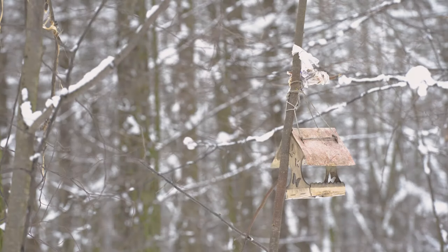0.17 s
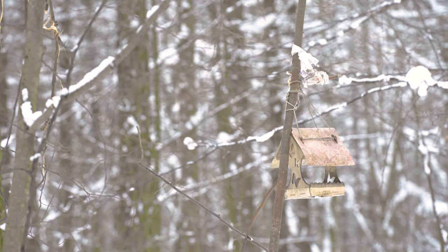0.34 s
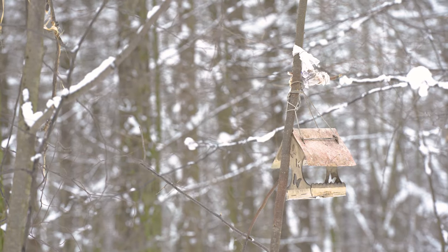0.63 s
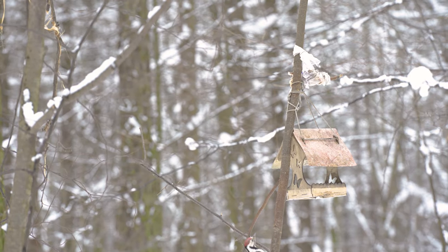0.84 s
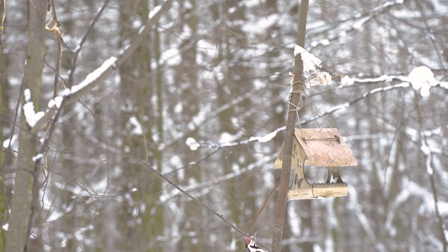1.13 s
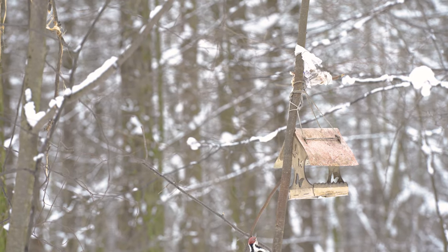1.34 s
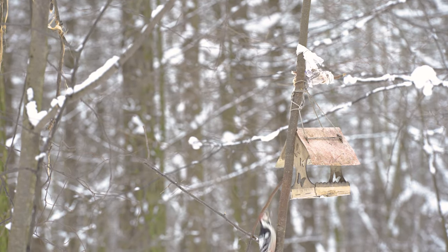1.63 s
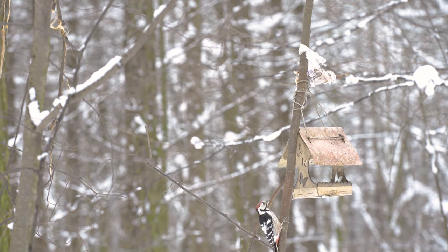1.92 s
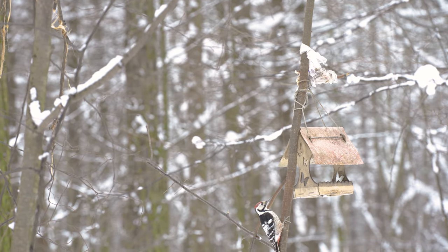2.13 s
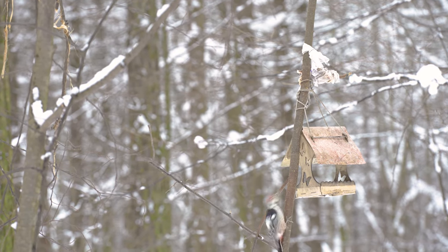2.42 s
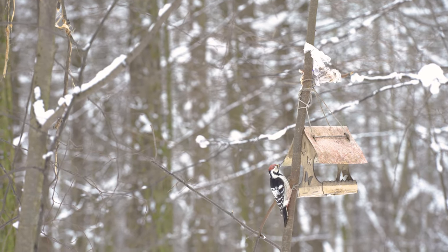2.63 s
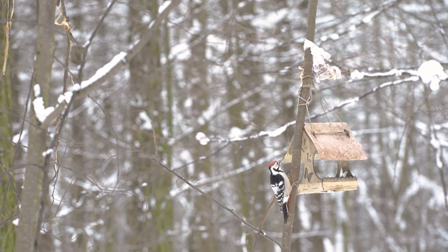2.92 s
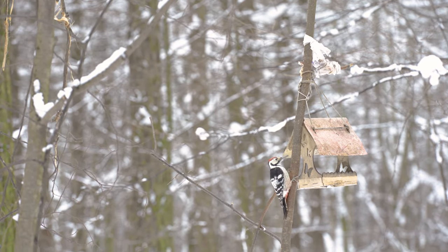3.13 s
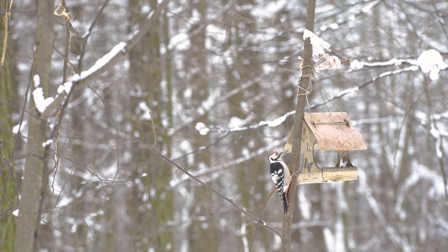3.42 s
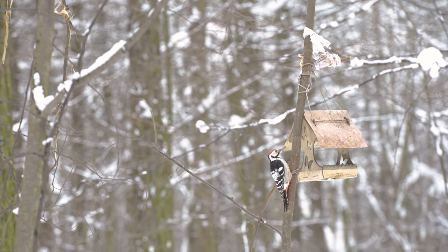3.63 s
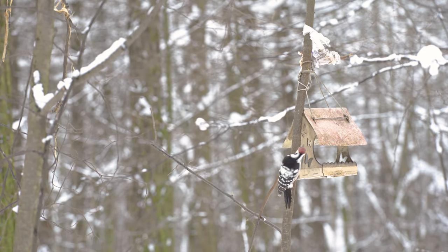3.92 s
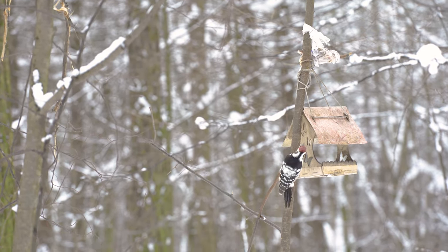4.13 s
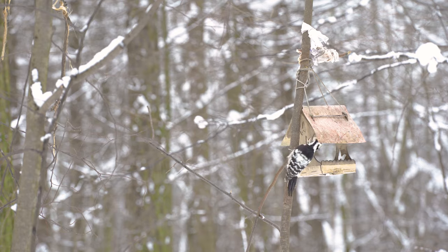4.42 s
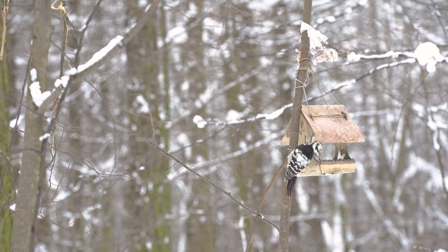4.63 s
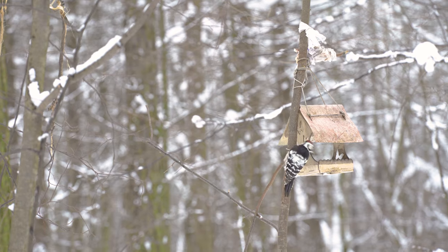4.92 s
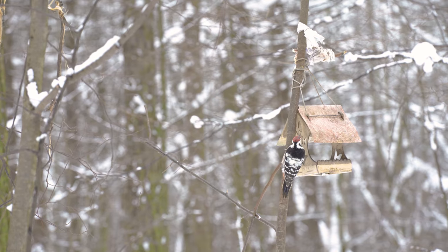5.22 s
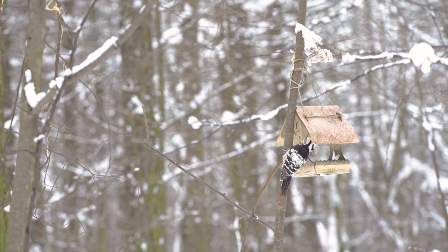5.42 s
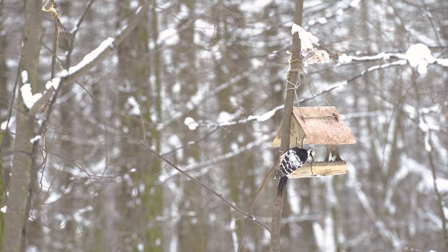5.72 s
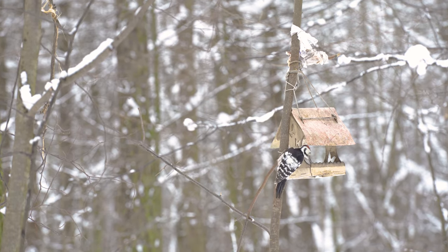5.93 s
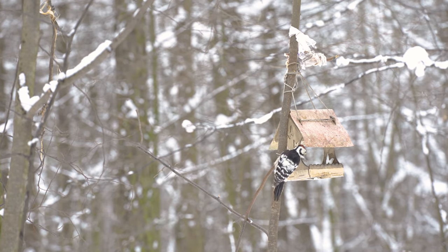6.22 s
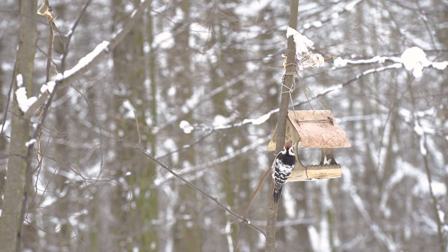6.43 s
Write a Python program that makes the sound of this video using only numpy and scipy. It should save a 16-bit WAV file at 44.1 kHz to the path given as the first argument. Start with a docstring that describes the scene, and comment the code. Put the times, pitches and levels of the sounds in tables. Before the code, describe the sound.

Quiet snowy woodland with a woodpecker at a wooden feeder, but the foreground is camera handling: loud plasticky snaps, rubbing and boomy knocks in the first half second, another knock near 1.4 seconds, then small sparse clicks. Two tiny high squeaks, bird-like and very short, stand out. Low thumps near the end precede final clicks and a bright rustle. Dry, close, mono sound over faint hiss.

```python
"""Handling a camera in a snowy forest

Close to the microphone of a hand-held camera, fingers click, scrape and knock on the housing: bursts of
noise and short swings set its parts ringing. Slow swings thump in the bass over a low rumble, a loose
part ticks, and two short squeaky calls, built from harmonics, ring out.
A distant wash and amplifier hiss, made of coloured noise, lie underneath."""
import sys
import numpy as np
from scipy import signal
from scipy.io import wavfile
from scipy.ndimage import uniform_filter1d

SR = 44100
rng = np.random.default_rng(int(sys.argv[2]) if len(sys.argv) > 2 else 0)


def int16_out(signal):
    """Quantize to a 16-bit WAV file."""
    q = np.round(np.clip(np.atleast_2d(signal).T, -1, 1) * 32767)
    wavfile.write(sys.argv[1], SR, q.astype(np.int16))


N = 289737  # length in samples


def gain_of(db):
    """Turns decibels into amplitude."""
    return 10 ** (np.asarray(db) / 20)


def evened(x):
    """Scales a sound to an rms (average strength) of 1."""
    return x / np.sqrt(np.mean(x ** 2, -1, keepdims=True) + 1e-20)


def read(points, hz):
    """Reads a table of (pitch, level) between its points, on a logarithmic pitch axis."""
    point_hz, value = np.transpose(points)
    return np.interp(np.log(hz + 1), np.log(point_hz + 1), value)


def add(mix, start_s, sound):
    """Mixes a sound in at a start time, cutting off what falls outside."""
    at = round(start_s * SR)
    sound = sound[max(-at, 0):]
    part = mix[max(at, 0):][:len(sound)]
    part += sound[:len(part)]


def shaped_noise(colour, patchy_db, size):
    """Noise with a given colour, whose short-time spectrum slowly drifts in patches; rms 1."""
    frames, hz = 4 * N // size + 5, np.fft.rfftfreq(size, 1 / SR)
    real, imaginary, patches = rng.standard_normal((frames, len(hz), 3)).T
    patches = uniform_filter1d(patches, size=12, axis=0)  # smooth over pitch
    patches = uniform_filter1d(patches, size=14, axis=1)  # smooth over time
    level_db = read(colour, hz)[:, None] + patchy_db * patches / patches.std()
    spectra = (real + 1j * imaginary) * gain_of(level_db)
    noise = signal.istft(spectra, nperseg=size, noverlap=3 * size // 4)[1]
    return evened(noise[:N])


def ring(modes, tune):
    """The answer to one tap: each mode swells, then dies; wider modes die sooner."""
    t = np.arange(512) / SR
    total = np.zeros(len(t))
    for k, (hz, width, db) in enumerate(modes):
        swell_and_fall = width ** 2 * t * np.exp(-np.pi * width * t)
        total += (-1) ** k * gain_of(db) * swell_and_fall * np.sin(2 * np.pi * hz * tune * t)
    return total


def housing(drive, treble_db, lower_db, fizz_db, tune):
    """One drive rings three groups of modes; the lower and fizz levels are relative to the treble."""
    # cavity by the microphone: pitch_hz [Hz, before tuning], width_hz [Hz], level_db [dB, relative]
    cavity = [(4900, 1700, -4.5), (5880, 700, -4.5), (6320, 570, 4), (6930, 1000, -4)]
    # shell of the housing: pitch_hz [Hz, before tuning], width_hz [Hz], level_db [dB, relative]
    shell = [(1408, 465, -8), (1800, 280, -1), (2190, 550, -2.5), (2613, 190, -4), (3106, 550, -4.5)]
    # smallest ribs and gaps: pitch_hz [Hz, before tuning], width_hz [Hz], level_db [dB, relative]
    ribs = [(8645, 1500, 2.5), (10830, 1300, -3.5), (12880, 790, -9)]
    mix = 0
    for modes, db in ((cavity, 0), (shell, lower_db), (ribs, fizz_db)):
        part = np.convolve(drive, ring(modes, tune))
        mix = mix + gain_of(db) * part / np.linalg.norm(part)
    return gain_of(treble_db) * np.linalg.norm(drive) * mix


def grip_tune(over_db):
    """Tuning factor of the modes: a firmer grip, taken from the level, lowers them."""
    return 1.04 - .002 * over_db


def forest_wash():
    """A steady bed of forest wash and amplifier hiss, from coloured noise that drifts a little."""
    # colour of the bed: pitch_hz [Hz], level_db [dB per Hz, relative]
    colour = [(24, -29.5), (40, -4), (66, -18.5), (99, -10), (189, -6.5), (276, -8.5), (320, -11.5),
              (392, -12.5), (491, -14), (873, -14.5), (2100, -33.5), (13400, -38.5), (16000, -49)]
    return gain_of(-62.5) * shaped_noise(colour, 1.4, size=1024)


def jolts():
    """Slow jolts of the hand swing the capsule a few times, over the rumble of an unsteady grip."""
    # rumble level: time_s [s], level_db [dB]
    grip = [(0, -33.5), (.3, -41), (.55, -63), (6.57, -63.5)]
    # colour of the rumble: pitch_hz [Hz], level_db [dB per Hz, relative]
    colour = [(8, -16.5), (25, -4), (50, -19.5), (90, -15.5), (140, -38), (300, -64)]
    # single jolts: centre_s [s], peak_db [dB], pitch_hz [Hz], half_width_ms [ms]
    swings = list([(.265, -15, 41, 11), (.434, -32.5, 22, 34), (1.166, -47.5, 29.34, 15.5),
                   (3.291, -51, 40, 16), (3.431, -43, 40, 25), (3.58, -52.5, 34.87, 20),
                   (4.62, -46, 34.6, 25), (5.731, -34.5, 41.8, 17.7), (5.781, -45, 45.4, 27),
                   (5.909, -34.5, 48, 23.5), (6.056, -34, 23.8, 25), (6.118, -33, 38.2, 24)])
    # shudder as the hand settles: pitch_hz [Hz], peak_db [dB]
    shudder = [(27.5, -29.5), (81.6, -41.5)]
    shudder_s, shudder_ms = .1, 102  # centre and half width
    swings += [(shudder_s, db, hz, shudder_ms) for hz, db in shudder]

    now = np.arange(N) / SR
    time_s, level_db = np.transpose(grip)
    out = gain_of(np.interp(now, time_s, level_db)) * shaped_noise(colour, 0.9, size=4096)
    for centre_s, db, hz, width_ms in swings:
        t = now - centre_s
        hump = np.exp(-(t * 1e3 / width_ms) ** 2)
        out -= gain_of(db) * hump * np.cos(2 * np.pi * hz * t)
    return out


def slip_grains():
    """Strength of rubbing over time: a steady hiss plus random slips that die in a few milliseconds."""
    slips_per_s, spread_db, slip_s, hiss = 310, 2, 0.0023, 0.606
    strength = gain_of(spread_db * rng.exponential(1, N + 1).clip(0, 3))
    slips = (rng.random(N + 1) < slips_per_s / SR) * strength
    dying = signal.lfilter([1], [1, -np.exp(-1 / (slip_s * SR))], slips)
    return hiss + uniform_filter1d(dying, size=50)


def settling_rustle():
    """A bright rustle as the hand settles: rubbing noise made more uneven, ringing the housing."""
    rustle_s = 0.2
    rubbing = rng.standard_normal(N + 1) * slip_grains() ** 1.7  # the power makes slips stand out
    out = np.zeros(N)
    add(out, 0, housing(evened(rubbing[-round(rustle_s * SR):]), -61.5, 1, -0.5, 0.93))
    return out


def scrapes():
    """Rubbing strokes of uneven noise ring the housing; harder ones favour the treble."""
    # strokes: start_s [s], end_s [s], treble_db [dB, before the fades]
    strokes = [(0.155, 0.186, -47.5), (.2, 0.31, -59.5), (0.292, 0.333, -37), (0.329, .361, -33),
               (0.361, 0.396, -37.5), (0.386, 0.43, -51.5), (0.427, 0.46, -47), (0.452, 0.478, -35),
               (0.473, 0.481, -28.5), (.497, 0.51, -45), (0.523, 0.622, -66), (0.637, 0.706, -64),
               (0.715, 0.833, -77.5), (0.817, 0.911, -64.5), (.911, .954, -59), (0.957, 1.043, -52),
               (1.253, 1.33, -70.5), (1.359, 1.389, -36.5), (1.413, 1.423, -40.5), (1.423, 1.48, -67),
               (1.696, 1.811, -63), (1.811, 1.894, -60.5), (2.574, 2.625, -67), (2.617, 2.656, -57),
               (2.672, 2.719, -52.5), (2.707, 2.76, -64.5), (3.477, 3.538, -75.5), (3.945, 3.995, -58.5),
               (3.991, 4.039, -49), (4.027, 4.109, -67.5), (4.417, 4.54, -61.5), (4.57, 4.662, -67.5),
               (6.257, 6.311, -59), (6.306, 6.354, -59), (6.345, 6.355, -38.5), (6.358, 6.375, -32.5),
               (6.386, 6.403, -36)]
    rise, fall = .17, .3  # shares of a stroke's length
    rubbing = rng.standard_normal(N + 1) * slip_grains()
    out = np.zeros(N)
    for start_s, end_s, db in strokes:
        drive = evened(rubbing[round(start_s * SR):round(end_s * SR)])
        u = np.linspace(0, 1, len(drive))
        fade = np.minimum(u / rise, 1) * np.minimum((1 - u) / fall, 1)
        lower_db = -5 - 0.31 * (db + 66.5)
        fizz_db = -19.5 + .27 * (db + 62)
        add(out, start_s, housing(drive * fade, db, lower_db, fizz_db, grip_tune(db + 62)))
    return out


def without_deep_bass(x):
    """Weakens what lies below 80 Hz."""
    return signal.sosfilt(signal.butter(2, 80, "high", fs=SR, output="sos"), x)


def knocks():
    """Each blow swings the capsule once, then the body modes nearest its pitch ring on."""
    # blows through the body: start_s [s], level_db [dB], pitch_hz [Hz]
    blows = [(0.2952, -17.5, 1000), (.297, -13, 248), (.312, -17, 149), (.327, -20, 210), (0.352, -32, 220),
             (.367, -27.5, 250), (0.371, -34.5, 1000), (.471, -29.5, 1000), (.473, -26.5, 310),
             (0.494, -29, 250), (.524, -40, 112), (1.004, -37.5, 215), (1.4052, -23.5, 280),
             (1.413, -15.5, 430), (1.4161, -19.5, 232), (1.447, -29.5, 200), (4.595, -30.5, 220),
             (4.616, -34, 218), (6.353, -39.5, 201), (6.375, -35, 202), (6.402, -44, 217),
             (6.537, -46.5, 148)]
    # body modes: pitch_hz [Hz], level_db [dB, relative], t60_s [s to fall by 60 dB]
    body = [(118.2, -2, .12), (154, 0, 0.091), (215.3, -4, 0.25), (270, -6.5, 0.082), (404, -12, 0.05),
            (561, -1, 0.072), (784, -13, 0.073), (1005.5, -0.5, 0.063)]
    rattle_per_khz, fall_db_per_octave, swell_s = 1, 4, 0.0057
    out, t = np.zeros(N), np.arange(8000) / SR
    rattles = rng.standard_normal((len(blows), len(t)))
    rattles = evened(uniform_filter1d(rattles, size=200, axis=1))
    for (start_s, db, blow_hz), rattle in zip(blows, rattles):
        swing = np.sin(2 * np.pi * blow_hz * t) * np.exp(-(t * blow_hz / 0.98) ** 2)
        modes = np.zeros(len(t))
        for k, (hz, mode_db, t60_s) in enumerate(body):
            far_db = fall_db_per_octave * abs(np.log2(hz / blow_hz))
            depth = rattle_per_khz * hz / 1e3  # higher modes rattle more
            unsteady = (1 + depth * rattle) / np.hypot(1, depth)
            tone = np.sin(2 * np.pi * hz * t)
            modes += (-1) ** k * gain_of(mode_db - far_db - 60 * t / t60_s) * tone * unsteady
        ring_db = -5 - 0.36 * (db + 34)  # softer knocks ring more
        ringing = gain_of(ring_db) * modes * (1 - np.exp(-t / swell_s))
        add(out, start_s, gain_of(db) * (swing + ringing))
    return without_deep_bass(out)


def clicks():
    """Snaps of the housing: noise bursts that die within milliseconds; louder are shorter, brighter."""
    # snaps: start_s [s], treble_db [dB], lower_db [dB, shell modes relative to the treble]
    snaps = [(.296, -15, -11), (.3195, -32, -20), (0.3291, -14, -12.5), (0.3334, -21, -26),
             (0.3389, -28, -14), (0.345, -29, -8), (0.3726, -29, -10), (0.4286, -31.5, -22),
             (0.46, -36, -35), (0.4716, -12.5, -16), (.493, -41.5, -2), (0.9657, -42, -3),
             (0.982, -39, -8.5), (1.004, -33.5, -13), (1.151, -65, -25), (1.2226, -44.5, -32),
             (1.2377, -50, -33), (1.377, -30.5, -27), (1.3922, -39, -13), (1.4052, -24, -10.5),
             (1.412, -22, -4.5), (1.713, -50.5, 0), (1.771, -51.5, -30), (1.831, -41.5, -2.5),
             (2.5705, -45.5, -14), (2.678, -57, -25), (2.693, -43, 0.5), (2.7025, -40, -18),
             (3.05, -69, -19), (3.48, -55, -19), (3.5012, -52.5, -25), (3.9582, -52, -4),
             (3.9996, -36.5, -18), (4.0117, -33, -7), (4.0224, -37.5, -4.5), (4.0522, -40, -13.5),
             (4.4371, -58, -6), (4.4634, -42, -5), (4.4703, -45, -6), (4.4879, -48, -1), (4.5502, -58.5, 9),
             (4.5744, -46.5, 0.5), (4.5947, -34, -9), (4.61, -45, -20), (6.2479, -55.5, -26),
             (6.27, -44, -21), (6.276, -42.5, -19), (6.284, -44, -16), (6.293, -49, -16),
             (6.3145, -48, -3.5), (6.323, -46, -8), (6.3679, -31.5, -35), (6.3752, -26, -22)]
    base_ms, ms_per_db, rise, tune_spread = .5, .045, .3, .025  # the rise is a share of the length
    out, ms = np.zeros(N), np.arange(1400) / SR * 1e3
    for start_s, db, lower_db in snaps:
        length_ms = base_ms - ms_per_db * db
        swell = 1 - np.exp(-ms / (rise * length_ms))
        drive = rng.standard_normal(len(ms)) * swell * np.exp(-(ms / (.8 * length_ms)) ** 1.06)
        drive *= np.sqrt(length_ms * SR / 1e3) / np.linalg.norm(drive)  # energy grows with length
        fizz_db = -22.5 + 0.23 * (db + 58.5)
        tune = grip_tune(db + 56.5) + tune_spread * rng.standard_normal()
        add(out, start_s, housing(drive, db, lower_db, fizz_db, tune))
    return out


def loose_part_ticks():
    """A loose part gives small dying tones, each with a tiny noise tick that rings the housing."""
    # ticks: start_s [s], level_db [dB], pitch_hz [Hz]
    pings = [(0.659, -42, 2620), (1.106, -48, 2650), (1.554, -63.5, 2650), (1.687, -57, 2650),
             (4.53, -52, 1820), (6.396, -56, 5750), (6.532, -61, 2570)]
    t60_s, rise_s, tick_s = .045, 0.00049, 0.00029
    out, t = np.zeros(N), np.arange(8000) / SR
    for start_s, db, hz in pings:
        level = gain_of(db - 60 * t / t60_s) * (1 - np.exp(-t / rise_s))
        add(out, start_s, level * np.sin(2 * np.pi * hz * t))
        tick = np.exp(-t[:60] / tick_s) * rng.standard_normal(60)
        add(out, start_s, housing(tick, db + 2, -5, -17.5, 0.852))
    return without_deep_bass(out)


def calls():
    """Harmonics whose pitch arches through a fixed throat; the weak ends are dull and unsteady."""
    # shape of a call: time_ms [ms, before stretch], pitch [share of top pitch], level_db [dB, relative]
    shape = [(0, .4, -33), (9.5, .52, -13), (12.5, .84, -.5), (18, .96, -2.5), (24, 1, -2), (28, .97, -1.5),
             (33.5, .85, -1), (35.8, .63, -5), (46, .51, -16), (50, .44, -38)]
    # calls: start_s [s], top_hz [Hz, before lean and wobble], level_db [dB], stretch [factor],
    # tilt_db [dB per octave], lean [pitch share per ms, before stretch]
    cries = [(1.303, 1725, -20.5, .91, -.6, .0045), (4.376, 1670, -19.5, .99, .8, .0002)]
    # throat: pitch_hz [Hz], level_db [dB of a harmonic, relative]
    throat = [(500, -44.5), (1000, -13), (1650, -4.5), (2300, -4.5), (3100, -7.5), (4200, -16), (5000, -19),
              (6500, -9.5), (8200, -19.5), (10000, -22.5), (12000, -33.5), (15000, -55)]
    time_ms, pitch, shape_db = np.transpose(shape)
    out = np.zeros(N)
    for start_s, top_hz, db, stretch, tilt_db, lean in cries:
        t = np.arange(0, time_ms[-1] * stretch, 1e3 / SR) / stretch  # ms along the unstretched shape
        arch = uniform_filter1d(np.interp(t, time_ms, pitch), size=70, mode="nearest")
        arch = arch * (1 + lean * (t - time_ms[-1] / 2))
        effort_db = np.interp(t, time_ms, shape_db)
        wobble = evened(uniform_filter1d(rng.standard_normal(len(t)), size=40))
        hz = top_hz * arch * (1 + (.002 + .015 * abs(1 - arch)) * wobble)
        turns = np.cumsum(hz) / SR
        stack = np.zeros(len(t))
        for k in range(1, 20):
            slope_db = (tilt_db + 0.075 * effort_db) * np.log2(k * hz / top_hz)  # weak parts are dull
            wave = np.cos(2 * np.pi * k * turns + 0.67 * k + 0.21 * k ** 2)
            stack += gain_of(read(throat, k * hz) + slope_db) * wave * (k * hz < 16000)
        flutter = uniform_filter1d(rng.standard_normal(len(t)), size=14)
        flutter = evened(uniform_filter1d(flutter, size=10))
        rasp = 1 + (.02 + .18 * abs(1 - arch)) * flutter
        add(out, start_s, -gain_of(db + effort_db) * stack * rasp * np.minimum(t / 2, 1))
    return out


def nearby(x):
    """Faint quick reflections from hands and clothes: a dulled noise tail that soon dies."""
    t = np.arange(4000) / SR
    tail = rng.standard_normal(len(t)) * gain_of(-60 * t / 0.098) * (t > .002)
    tail = signal.lfilter([1], [1, -.7], tail)  # dulls the treble
    return gain_of(-17) * signal.oaconvolve(x, tail / np.linalg.norm(tail))[:N]


def scene():
    """Adds all sources into one channel; the clicks, rubbing and calls also reflect nearby."""
    bed = forest_wash() + jolts()
    close = settling_rustle() + scrapes() + clicks() + calls()
    return (bed + close + nearby(close) + knocks() + loose_part_ticks())[None]


def record(dry):
    """Removes what lies above the band limit of 15700 Hz."""
    band = signal.firwin(511, 15700, window=("kaiser", 9), fs=SR)
    return signal.oaconvolve(dry, band[None], "same")


dry = scene()
out = record(dry)
int16_out(out)
```